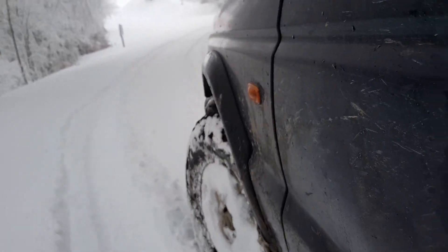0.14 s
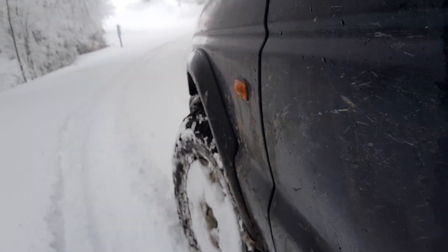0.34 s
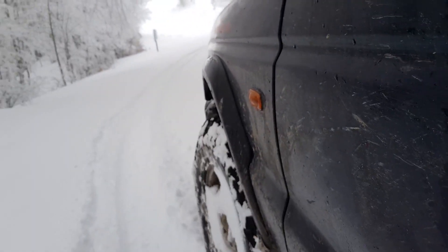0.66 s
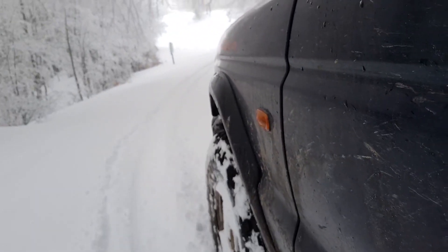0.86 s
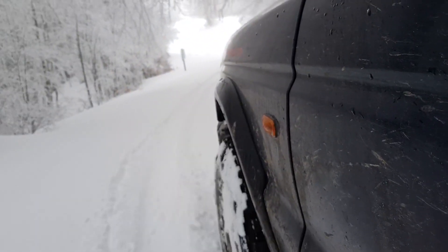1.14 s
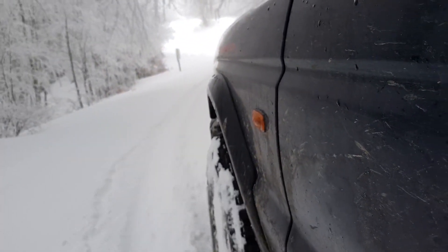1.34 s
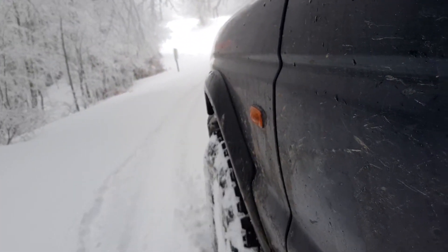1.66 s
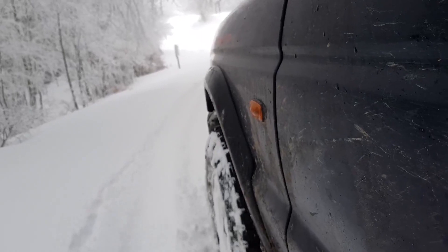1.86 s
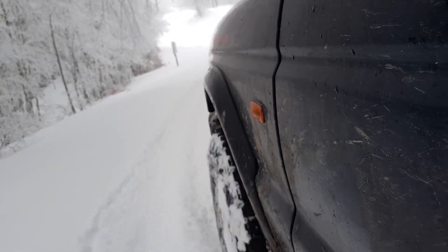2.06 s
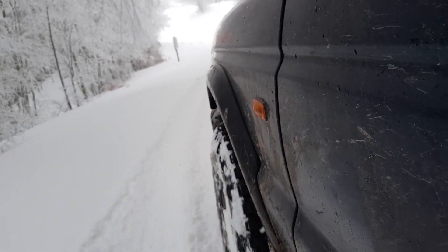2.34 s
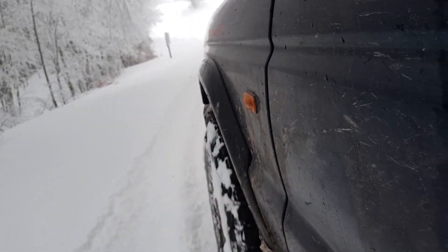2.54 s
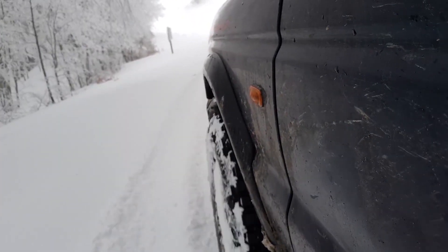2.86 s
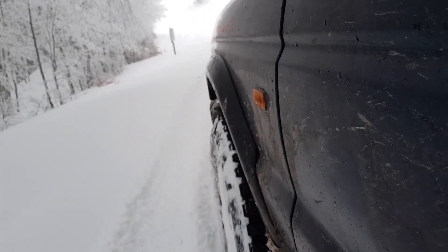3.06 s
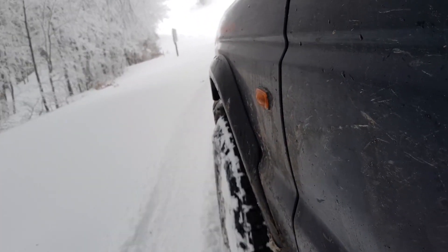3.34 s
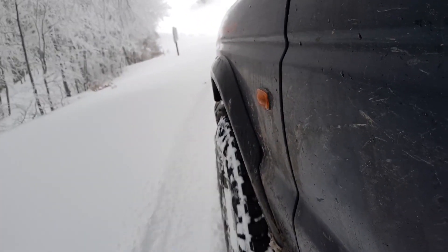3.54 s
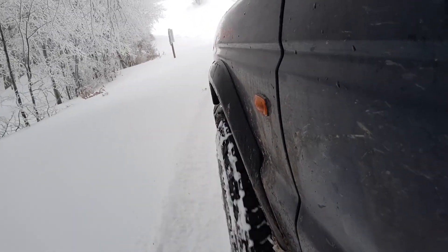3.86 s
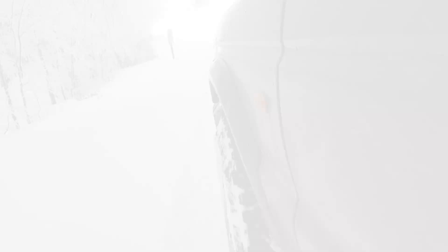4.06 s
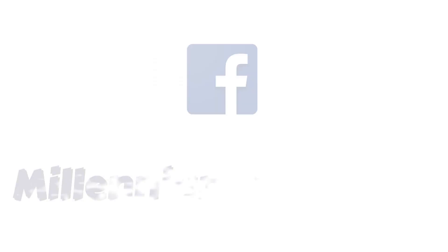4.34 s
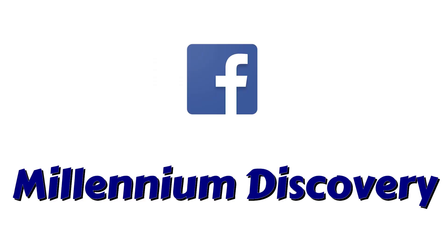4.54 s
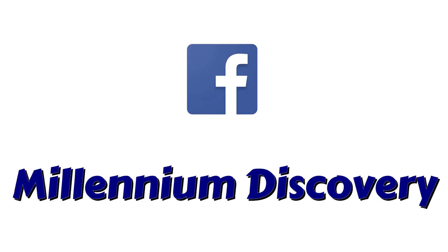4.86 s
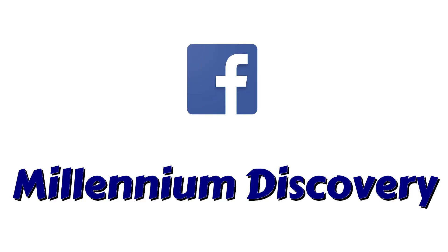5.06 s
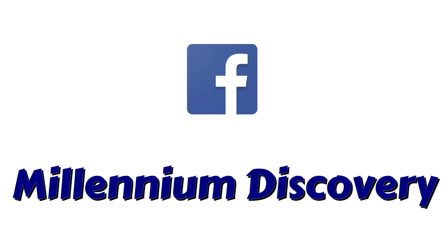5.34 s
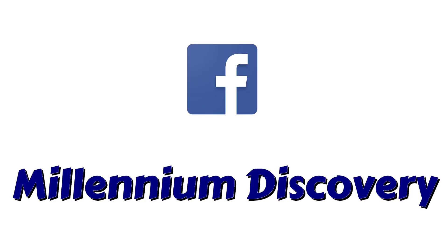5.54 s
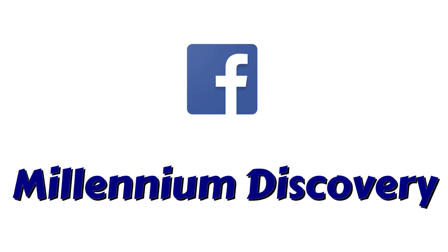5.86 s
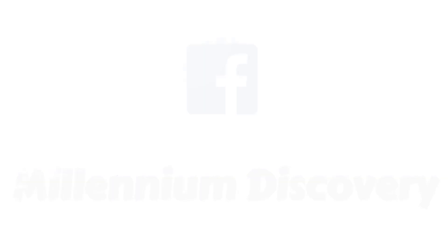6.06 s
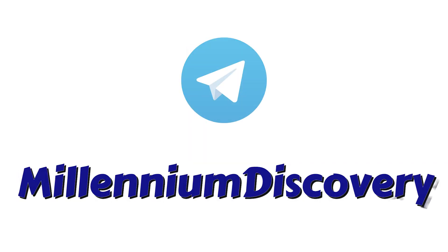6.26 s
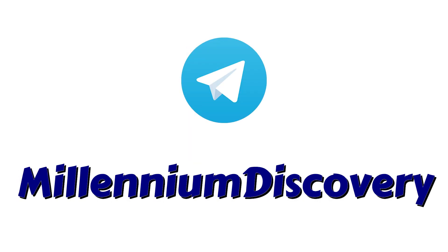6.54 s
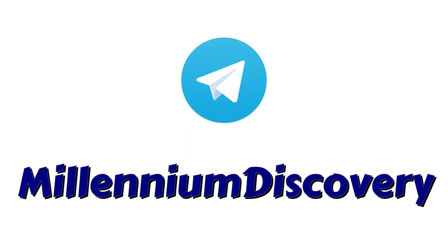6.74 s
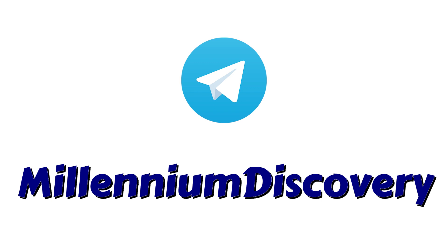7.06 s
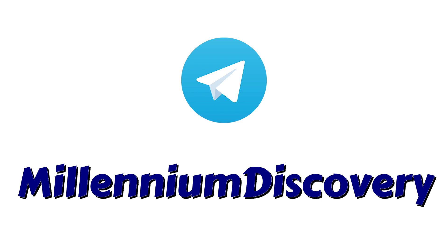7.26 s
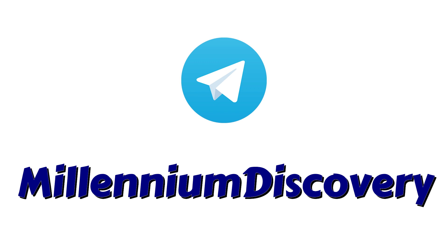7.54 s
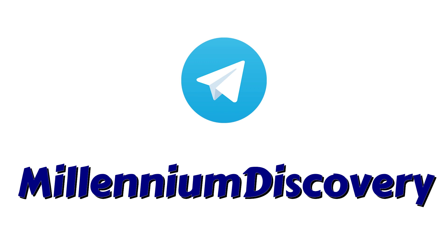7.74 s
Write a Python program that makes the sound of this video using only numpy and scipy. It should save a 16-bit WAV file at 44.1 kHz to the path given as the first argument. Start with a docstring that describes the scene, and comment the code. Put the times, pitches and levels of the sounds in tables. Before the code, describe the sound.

The sound fades in over the first 0.6 s: a five-cylinder diesel lugs at about 1,050 rpm, heard close beside the front wheel outdoors. Uneven knocks, a low thud and one sharper piston slap per cycle mix with snow scrubbing under the turned wheel until about 0.8 s. Between 0.5 and 1.75 s loose sheet metal buzzes in short ringing bursts, with a thin ping around 0.6 to 1 s. From 1.6 s the clatter hardens and evens out, revs climbing to about 2,490 by 4.5 s; boom, whines, intake hiss and a faint high turbo whistle rise. Snow crunch is strongest around 2 s, then gives way to tyre roar, tread hum and fine spray. Tiny ice ticks occur, notably near 3.9 and 4.7 s. Speed then holds, with slight rev dips around 5.5 and 7.5 s and a gust near 6.9 s. From 7.2 s everything fades steadily.

```python
"""First, as the sound fades in, an engine booms and knocks: a five-cylinder diesel off-roader on a snowy road,
heard from beside the front wheel. Its boom, drone and whines are tones locked to the crank; its clatter is
noise that partly repeats on each cycle. Piston slap and bursts of rattling metal give way to hard clatter
and a rising turbo whistle. Filtered noise makes the roar of tyres and wind, and intake air hisses.
Clicks make the snow, the tread hums as tones, ice ticks, and at the end all fades out."""
import sys
import numpy as np
from scipy import signal
from scipy.fft import rfft, irfft, next_fast_len
from scipy.io import wavfile
from scipy.ndimage import uniform_filter1d

SR = 44100
rng = np.random.default_rng(int(sys.argv[2]) if len(sys.argv) > 2 else 0)


def int16_out(signal):
    """Quantize to a 16-bit WAV file."""
    q = np.round(np.clip(np.atleast_2d(signal).T, -1, 1) * 32767)
    wavfile.write(sys.argv[1], SR, q.astype(np.int16))


N = 348381
TIME = np.arange(N) / SR  # s
LEFT_RIGHT = np.array([[1], [-1]])  # side sound has opposite signs left and right
# the engine runs lumpily below the first speed and evenly above the second
LUGGING_RPM, REVVING_RPM = 1390, 1870
CRUISE_HZ = 35  # tread repeats per second at cruising speed


def undb(db):
    """Turn decibels into a gain."""
    return 10 ** (np.asarray(db) / 20)


def unit(x):
    """Scale to an rms of 1."""
    return x / np.sqrt(np.mean(x ** 2))


def bump(x, centre, width):
    """A bell curve: 1 at the centre."""
    return np.exp(-((x - centre) / width) ** 2)


def ramp(x, start, length):
    """0 before the start, 1 once the length has passed."""
    return np.clip((x - start) / length, 0, 1)


def ring_down(age, t60):
    """Die away by 60 dB in t60 seconds."""
    return np.exp(-np.log(1000) * age / t60)


def curve(table):
    """Draw straight lines between the points of a timed table."""
    s, values = np.transpose(table)
    return np.interp(TIME, s, values)


def colour(x, spectrum):
    """Filter by a spectrum table, joining its points on a log pitch scale."""
    hz, db = np.transpose(spectrum)
    size = next_fast_len(N + 4096)
    bins = np.maximum(np.arange(size // 2 + 1) * SR / size, 1)
    gain = undb(np.interp(np.log(bins), np.log(hz), db))
    return irfft(rfft(x, size) * gain, size)[..., :N]


# width of the sound, side compared with mid: (f/Hz, level/dB)
STEREO_WIDTH = [(60, -28), (300, -20), (700, -14), (1400, -7.5), (2800, -3), (5500, -3.5), (9000, 0.5),
                (16000, 1)]


def radiate(pair, spectrum):
    """Colour two unrelated signals and spread them as mid and side: narrow bass, wide treble."""
    mid, side = colour(pair, spectrum)
    return unit(mid + colour(side, STEREO_WIDTH) * LEFT_RIGHT)


def walk(rate):
    """Wander at random: levels held for 1 / rate seconds, then smoothed twice; spread near 1."""
    k = int(SR / rate)
    held = np.repeat(rng.standard_normal(N // k + 1), k)
    return 1.27 * uniform_filter1d(uniform_filter1d(held, k), k)[:N]


def tone(turns, waver_db, smear, rate):
    """A sine of rms near 1 whose level (dB) and phase (radians) wander."""
    level = np.sqrt(2) * undb(waver_db * walk(rate))
    return level * np.sin(2 * np.pi * turns + smear * walk(rate))


def grains(rate, spread_db):
    """Random clicks, so many a second; a wider spread makes a few much larger than the rest."""
    sizes = undb(spread_db * np.minimum(rng.exponential(size=(2, N)), 5))
    clicks = rng.random((2, N)) < rate / SR
    return unit(clicks * sizes * rng.standard_normal((2, N)))


def whistle(turns, stir):
    """A breathy whistle: turbulence stirs its phase so many times a second."""
    mid, side = (tone(turns, waver_db=2.5, smear=2.2, rate=stir) for _ in range(2))
    return (mid + .5 * side * LEFT_RIGHT) * undb(1.2 * walk(14))


# engine tones that boom in body and pipes: multiples of the two-turn working cycle
BOOM_MULTIPLES = (5, 10, 11, 16)
# strength of each before the body acts: (level/dB at low revs, level/dB at high revs)
BOOM_STRENGTHS = [(-22, -23.5), (-27, -29), (-50, -26.5), (-28.5, -27)]
# resonances of body and pipes that the tones climb through: (f/Hz, level/dB)
BODY_RESONANCES = [(44, -8.5), (54, -5), (66, -0.5), (74, 2.5), (83, -6.5), (95, -12.5), (108, -12.5),
                   (130, -4), (160, -15), (192, -16.5), (212, -6), (232, -7.5), (257, -1.5), (278, -16),
                   (350, -14.5)]
# the firing tone briefly swells or sinks: (t/s, width/s, level/dB)
FIRING_SWELLS = [(4.6, 0.25, -16), (5.1, 0.23, 6.5), (5.6, 0.14, 2.5), (6.0, 0.2, -3), (6.5, 0.13, 6.5)]


def boom(cycles, rpm, revving):
    """Low engine tones swell and sink as they climb through the resonances of the body."""
    body_hz, body_db = np.transpose(BODY_RESONANCES)
    tones = []
    for k, (slow_db, fast_db) in zip(BOOM_MULTIPLES, BOOM_STRENGTHS):
        tone_hz = k * rpm / 120  # one cycle is two turns
        resonance_db = np.interp(np.log(tone_hz), np.log(body_hz), body_db)
        db = slow_db + (fast_db - slow_db) * revving + resonance_db
        tones.append(undb(db) * tone(k * cycles, waver_db=.4, smear=.04, rate=12))
    swell_db = sum(db * bump(TIME, s, width) for s, width, db in FIRING_SWELLS)
    return tones[0] * undb(swell_db) + sum(tones[1:])


# further engine tones, at full strength: (multiple of the working cycle, level/dB)
DRONE_TONES = [(3, -47), (6, -39), (8, -47), (9, -33.5), (13, -42), (17, -39), (28, -46)]


def drone(cycles, rpm):
    """More tones in step with the crank sound at a quarter strength, then rise fully at high revs."""
    tones = 0
    for k, db in DRONE_TONES:
        tones = tones + undb(db) * tone(k * cycles + rng.random(), waver_db=1.4, smear=.3, rate=5)
    return tones * (.25 + .75 * ramp(rpm, 2330, 280))


# one knock for each cylinder, in firing order: (level/dB, counted twice at low revs; level/dB, added to the
# first at high revs)
CYLINDER_KNOCKS = [(-3, -1), (-7, -2), (-5.5, -1), (-7, -4), (-6, -4)]
# clatter left between knocks: slow firings leave deeper gaps
BETWEEN_SLOW, BETWEEN_FAST = 0.13, 0.44
KNOCK_LENGTH = 0.34  # share of the time between firings


def knocks(cycles, revving, count=5):
    """Each cylinder fires with a sharp knock that dies away; they even out as the revs rise."""
    cylinder = (cycles * count).astype(int) % count
    since = cycles * count % 1
    slow_db, fast_db = np.transpose(CYLINDER_KNOCKS)
    knock_db = slow_db[cylinder] * (2.0 - revving) + fast_db[cylinder] * revving + .7 * walk(60)
    between = BETWEEN_SLOW + (BETWEEN_FAST - BETWEEN_SLOW) * revving
    blow = between + undb(knock_db) * np.exp(-(since / KNOCK_LENGTH) ** 2)
    # keep the average strength steady over a quarter of a second
    return blow / np.sqrt(uniform_filter1d(blow ** 2, SR // 4))


def rattle(cycles, repeat, size=16384, count=420):
    """Vibration that comes back alike on each working cycle, mixed with a share that is new each time."""
    partials = np.zeros((2, size // 2 + 1), complex)
    partials[:, 1:count + 1] = np.exp(2j * np.pi * rng.random((2, count)))
    partials[:, list(BOOM_MULTIPLES) + [k for k, _ in DRONE_TONES]] = 0  # these sound in boom and drone
    place = cycles % 1 * size
    alike = np.array([np.interp(place, np.arange(size), p) for p in irfft(partials)])
    # both shares have the same strength per Hz
    rate = np.gradient(cycles) * SR
    alike = unit(alike) * np.sqrt(2 * count * rate / SR)
    return np.sqrt(repeat) * alike + np.sqrt(1 - repeat) * rng.standard_normal((2, N))


# engine load, heard as the level of the clatter: (t/s, level/dB)
ENGINE_LOAD = [(0, -43), (.6, -41), (1.1, -45.5), (1.6, -37), (2.6, -35), (3.4, -35), (3.95, -34),
               (4.4, -35.5), (7.2, -34)]
# relative spectrum of the low thud: (f/Hz, level/dB)
THUD_SPECTRUM = [(30, -39), (70, -9), (130, 0), (180, 1), (260, 2), (360, 0.5), (430, -17), (560, -16.5),
                 (750, -18), (1200, -48.5)]
# relative spectrum of the hard ringing: (f/Hz, level/dB)
RING_SPECTRUM = [(250, -54), (500, 3.5), (750, -2), (1050, 0), (1200, 2.5), (1400, -5), (1530, -6),
                 (1690, -6.5), (1820, -6), (2300, -13.5), (3000, -20.5), (3800, -18), (5000, -25),
                 (14000, -59)]
# share of the ringing clatter that repeats: slow firings differ more
REPEAT_SLOW, REPEAT_FAST = 0.59, 0.88


def clatter(cycles, revving):
    """Each knock shakes the engine block, which thuds low and rings hard."""
    blow = knocks(cycles, revving)
    shake = rattle(cycles, repeat=.85) * np.sqrt(blow)
    hard = rattle(cycles, repeat=REPEAT_SLOW + (REPEAT_FAST - REPEAT_SLOW) * revving) * blow
    thud = radiate(shake, THUD_SPECTRUM) * undb(8.0 - 6.8 * revving)
    ring = radiate(hard, RING_SPECTRUM) * undb(.8 - .5 * revving)
    return undb(curve(ENGINE_LOAD)) * (thud + ring)


# pitches at which the block rings when one piston slaps: (f/Hz, relative level/dB, t60/s)
SLAP_RINGS = [(560, -7, .025), (720, -4, .035), (900, -5, .02), (1020, 0, .028), (1130, -4, .02),
              (1215, -1, .032), (1450, -7, .02), (1780, -9, .02)]
# relative spectrum of loose metal, also used for the crack: (f/Hz, level/dB)
METAL_SPECTRUM = [(300, -8), (900, -5), (1300, -5), (1480, -1), (1680, -7), (1820, -1), (2300, -7),
                  (2850, -6), (3200, -11), (3480, -5), (4100, -19), (6000, -25), (12000, -36), (16000, -46)]
SLAP_DB, SLAP_REVVING_DB, SLAP_RISE_S = -31, .5, .0015
SLAP_FADES_RPM, SLAP_FADE_RANGE_RPM = 1470, 520
# while the engine lugs, every slap cracks sharply and sets off a thin metallic ping
PING_HZ, PING_RPM, PING_RANGE_RPM, PING_DB, PING_T60_S = 3550, 1275, 70, -41, .06
CRACK_DB, CRACK_T60_S = -35, .055


def slap(cycles, rpm, revving):
    """One piston slaps the block once a cycle until the revs are high; crack and ping join while it lugs."""
    age = cycles % 1 * 120 / rpm  # seconds since the slap

    def mode(hz, t60):
        """One pitch of struck metal, quick to rise and slower to die away."""
        shape = (1 - np.exp(-age / SLAP_RISE_S)) * ring_down(age, t60)
        return shape * tone(hz * age, waver_db=.8, smear=1.6, rate=260)

    block = sum(undb(db) * mode(hz, t60) for hz, db, t60 in SLAP_RINGS)
    block = block * undb(SLAP_DB + SLAP_REVVING_DB * revving)
    block = block * (1 - ramp(rpm, SLAP_FADES_RPM, SLAP_FADE_RANGE_RPM))
    crack = radiate(grains(rate=5000, spread_db=1.5), METAL_SPECTRUM) * ring_down(age, CRACK_T60_S)
    ping = mode(PING_HZ, PING_T60_S) * undb(PING_DB)
    return block + (ping + crack * undb(CRACK_DB)) * bump(rpm, PING_RPM, PING_RANGE_RPM)


# relative spectrum of snow spray: (f/Hz, level/dB)
SPRAY_SPECTRUM = [(1200, -9), (2400, 1.5), (3100, -0.5), (3600, 3.5), (4050, 1.5), (4800, -6.5),
                  (5500, -3.5), (7000, -10.5), (8000, -8.5), (9000, -13.5), (11000, -13.5), (13500, -22),
                  (16000, -40)]
# relative spectrum of the fine powder, which hisses at any speed: (f/Hz, level/dB)
POWDER_SPECTRUM = [(5000, -20), (8000, -2), (11500, 4), (13500, -4), (16000, -12)]
# spray level at cruising speed, and its rise for each doubling of road speed
SPRAY_DB, SPRAY_DB_PER_OCTAVE = -46.5, 13
POWDER_DB = -67


def snow(tread_hz, lift_db):
    """Snow thrown off the tread patters finely in the wheel arch, over a thin hiss of powder."""
    octaves = np.log2(tread_hz / CRUISE_HZ)
    patter = grains(rate=20000, spread_db=1.2) * undb(.8 * walk(30))
    spray = radiate(patter, SPRAY_SPECTRUM) * undb(SPRAY_DB + SPRAY_DB_PER_OCTAVE * octaves)
    powder = radiate(grains(rate=6600, spread_db=0.0), POWDER_SPECTRUM) * undb(POWDER_DB)
    return (spray + powder) * undb(lift_db)


# relative spectrum of tyres and wind: (f/Hz, level/dB)
ROAR_SPECTRUM = [(20, -40), (35, -13.5), (60, -6), (110, -1.5), (200, -3), (370, -1), (450, -5.5),
                 (600, -4.5), (900, -13.5), (1400, -16), (1700, -24.5), (2100, -22), (3000, -31.5),
                 (7000, -53.5)]
# roar level at cruising speed, and its rise for each doubling of road speed
ROAR_DB, ROAR_DB_PER_OCTAVE = -27, 17.5


def roar(tread_hz, lift_db):
    """Tyres and wind make an uneven rushing noise that grows with road speed."""
    octaves = np.log2(tread_hz / CRUISE_HZ)
    uneven = undb(.5 * walk(3.48) + 0.49 * walk(45))
    rush = radiate(rng.standard_normal((2, N)) * uneven, ROAR_SPECTRUM)
    return rush * undb(ROAR_DB + ROAR_DB_PER_OCTAVE * octaves + lift_db)


# tones of the unevenly spaced tread blocks, before the rise with road speed:
# (multiple of the tread rate, level/dB while gathering speed, level/dB when cruising)
TREAD_TONES = [(9, -38.5, -40), (11, -44, -33.5), (13, -49, -43), (14, -50, -44), (15, -44, -40.5),
               (17, -45, -45), (28, -62, -54)]
HUM_DB_PER_OCTAVE = 21  # rise for each doubling of road speed
HUM_BUILDS_HZ, HUM_BUILD_RANGE_HZ = 32.6, 1.2  # tread rates at which the hum takes its cruising levels
# the axle whine lifts above its base level around one tread rate
AXLE_MULTIPLE = 26  # of the tread rate
AXLE_DB, AXLE_PEAK_HZ, AXLE_WIDTH_HZ, AXLE_LIFT_DB = -60, 31.6, 3.0, 17


def hum_and_axle(tread_hz):
    """Tread blocks hum and the axle whines, all as tones in step with the road speed."""
    turns = np.cumsum(tread_hz) / SR
    cruising = ramp(tread_hz, HUM_BUILDS_HZ, HUM_BUILD_RANGE_HZ)
    hum = 0
    for k, slow_db, fast_db in TREAD_TONES:
        level = undb(slow_db + (fast_db - slow_db) * cruising)
        hum = hum + level * tone(k * turns, waver_db=1.6, smear=.3, rate=12)
    hum = hum * undb(HUM_DB_PER_OCTAVE * np.log2(tread_hz / CRUISE_HZ))
    axle = tone(AXLE_MULTIPLE * turns, waver_db=2, smear=.5, rate=14)
    axle_db = AXLE_DB + AXLE_LIFT_DB * bump(tread_hz, AXLE_PEAK_HZ, AXLE_WIDTH_HZ)
    return hum + axle * undb(axle_db)


# bursts from loose sheet metal as the throttle opens: (t/s, level/dB)
METAL_BURSTS = [(0.490, -38.5), (.511, -45), (.589, -39.5), (.607, -46), (0.682, -39.5), (0.770, -40.5),
                (0.954, -50), (1.317, -48), (1.398, -40.5), (1.549, -42), (1.742, -38)]
RATTLE_HZ, RATTLE_RING_DB, RATTLE_SWELL_S = 1474, -7, 0.006
RATTLE_GRAIN_HZ, RATTLE_CHATTER_DB = 260, 3  # how fast and how strongly the bursts flutter


def loose_metal():
    """A loose piece of sheet metal buzzes in short, ringing bursts."""
    bursts = np.zeros(N)
    for s, db in METAL_BURSTS:
        age = np.maximum(TIME - s, 0) / RATTLE_SWELL_S
        bursts += undb(db) * age * np.exp(1 - age)
    bursts = bursts * undb(RATTLE_CHATTER_DB * walk(RATTLE_GRAIN_HZ))
    ring = undb(RATTLE_RING_DB) * tone(RATTLE_HZ * TIME, waver_db=1.5, smear=.8, rate=150)
    buzz = radiate(grains(rate=9000, spread_db=1), METAL_SPECTRUM)
    return bursts * (buzz + ring)


# relative spectrum of crunching snow: (f/Hz, level/dB)
CRUNCH_SPECTRUM = [(300, -22), (700, 2.5), (1400, 1), (2200, -12.5), (3400, -6.5), (5000, -27),
                   (12000, -50)]
CRUNCH_DB = -46.5
CRUNCH_PEAK_HZ, CRUNCH_RANGE_HZ = 28.9, 4.2  # tread rate where loudest, and range


def crunch(tread_hz):
    """Below cruising speed the snow packs under the tread in irregular clusters of tiny cracks."""
    cracks = grains(rate=900, spread_db=1.5) * undb(2.5 * walk(40))
    level = undb(CRUNCH_DB) * bump(tread_hz, CRUNCH_PEAK_HZ, CRUNCH_RANGE_HZ)
    return radiate(cracks, CRUNCH_SPECTRUM) * level


# bits of ice tick against the wing; ICE_DB is added to each level: (t/s, level/dB, f/Hz)
ICE_HITS = [(1.0631, -51, 10300), (1.343, -52, 11400), (1.8174, -55, 10100), (2.408, -51, 10500),
            (3.9, -49, 7000), (3.95, -51, 7000), (4.7213, -44, 10000)]
ICE_DB, ICE_T60_S = -2.5, 0.04


def ice():
    """Small bits of ice hit the metal with a dry tick: a short burst of noise around one pitch."""
    out = np.zeros(N)
    for s, db, hz in ICE_HITS:
        age = np.maximum(TIME - s, 0)
        noise = rng.standard_normal(N)
        crack = unit(signal.lfilter(*signal.iirpeak(hz, 2, fs=SR), noise))
        out += undb(db + ICE_DB) * crack * (age > 0) * ring_down(age, ICE_T60_S)
    return out


# pitch and level of the whistle at TURBO_RPM, and how both climb with the revs
TURBO_RPM, TURBO_HZ, TURBO_HZ_PER_RPM = 1750, 10700, 8.6
TURBO_DB, TURBO_DB_PER_RPM, TURBO_OCTAVE_BELOW_DB = -75.3, 0.001, -72


def turbo(rpm):
    """The turbo whistle climbs in step with the revs; at high revs the octave below joins it."""
    above = rpm - TURBO_RPM
    turns = np.cumsum(TURBO_HZ + TURBO_HZ_PER_RPM * above) / SR
    high = whistle(turns, stir=480) * ramp(rpm, 1500, 250) * undb(TURBO_DB + TURBO_DB_PER_RPM * above)
    low = whistle(turns / 2, stir=300) * ramp(rpm, 2200, 100) * undb(TURBO_OCTAVE_BELOW_DB)
    return high + low


# gear and belt whines, each swelling as it climbs through a resonance:
# (multiple of the working cycle, level/dB, loudest at/rpm, range/rpm)
DRIVE_WHINES = [(35, -46, 2040, 140), (42, -41, 2630, 70), (43, -44.5, 2630, 80), (47, -44, 2410, 65),
                (47, -43.5, 2630, 70), (48, -48, 2330, 150), (52, -46, 2380, 140), (54, -44, 2620, 130),
                (56, -46.5, 2470, 130), (58, -46, 2630, 90), (59, -42, 2560, 270), (61, -46.5, 2610, 100),
                (61, -45, 2290, 90), (64, -41, 2310, 130), (64, -50, 2560, 120), (66, -46, 2540, 130),
                (66, -47, 2260, 120), (69, -46.5, 2080, 130), (74, -47, 1970, 80), (75, -57, 2480, 90),
                (79, -50, 1830, 110), (81, -49, 1760, 100), (83, -52, 2630, 60), (84, -50, 1760, 100)]


def whines(cycles, rpm):
    """Gears and belts whine in step with the crank, each loudest around its own engine speed."""
    out = 0
    for k, db, best, span in DRIVE_WHINES:
        line = tone(k * cycles + rng.random(), waver_db=1.5, smear=.3, rate=7)
        out = out + undb(db) * bump(rpm, best, span) * line
    return out


# intake cavities, each hissing over its own range of revs: (f/Hz, loudest at/rpm, range/rpm, level/dB)
INTAKE_CAVITIES = [(3990, 1880, 130, -54), (4045, 2290, 230, -52), (5300, 2330, 120, -62),
                   (3040, 2460, 80, -60), (3730, 2470, 77, -56), (4030, 2635, 25, -55)]
INTAKE_DRIFT = .004  # share of the pitch


def intake(rpm):
    """Rushing air sets one cavity after another hissing as the revs rise; their pitches drift a little."""
    drifting = np.cumsum(1 + INTAKE_DRIFT * walk(4)) / SR
    out = 0
    for hz, best, span, db in INTAKE_CAVITIES:
        out = out + undb(db) * bump(rpm, best, span) * whistle(hz * drifting, stir=260)
    return out


def engine(rpm):
    """Add up boom, drone, whines, slap and clatter, all locked to the crankshaft."""
    # working cycles so far, with a slight wander in timing
    cycles = .018 + np.cumsum(rpm / 120) / SR + .003 * walk(3)
    revving = ramp(rpm, LUGGING_RPM, REVVING_RPM - LUGGING_RPM)
    tones = boom(cycles, rpm, revving) + drone(cycles, rpm) + whines(cycles, rpm)
    return tones + slap(cycles, rpm, revving) + clatter(cycles, revving)


# narrow resonances of the wing and wheel arch: (f/Hz, width/Hz, lift level/dB)
PANEL_RESONANCES = [(838, 32, 3), (959, 23, 3.5), (1263, 107, 2.5), (1501, 32, 6.5), (1827, 29, 5.5),
                    (2154, 36, 4), (2535, 110, 3.5), (3010, 60, 3), (4460, 110, 2.5), (8000, 410, 2.5)]


def panels(x):
    """Sheet metal and arch ring at a few narrow pitches and colour all that passes them."""
    out = x
    for hz, width_hz, db in PANEL_RESONANCES:
        peak = signal.lfilter(*signal.iirpeak(hz, hz / width_hz, fs=SR), x)
        out = out + (undb(db) - 1) * peak
    return out


# crankshaft speed: (t/s, speed/rpm)
CRANK_SPEED = [(0.0, 1053), (0.32, 1119), (0.65, 1305), (1.23, 1380), (1.73, 1717), (2.43, 1889),
               (2.8, 1998), (3.0, 2045), (3.2, 2109), (3.5, 2230), (3.8, 2288), (4.2, 2411), (4.55, 2489),
               (4.8, 2481), (5.15, 2497), (5.5, 2438), (5.8, 2490), (6.0, 2504), (6.4, 2576), (7.0, 2635),
               (7.25, 2622), (7.52, 2522), (7.9, 2640)]
# road speed, as the rate at which the tread pattern repeats: (t/s, f/Hz)
TREAD_RATE = [(0, 20), (1.7, 27.95), (2.1, 29.4), (2.5, 30.35), (2.9, 31.07), (3.3, 31.9), (3.7, 32.96),
              (4.1, 33.85), (4.5, 34.65), (5.1, 34.97), (5.7, 34.82), (6.1, 34.96), (6.95, 35.72),
              (7.9, 35.3)]
# the steered wheel scrubs through deep snow until it straightens
STRAIGHTENS_S, STRAIGHTEN_TAKES_S, SCRUB_SPRAY_DB = 0.72, 0.18, 4
# one broad gust of wind lifts the roar and the snow
GUST_S, GUST_WIDTH_S, GUST_DB = 6.9, 0.31, 1.5


def scene():
    """Revs drive engine and air, road speed drives tyres and snow; all pass the wing, louder on the left."""
    rpm = curve(CRANK_SPEED)
    tread_hz = curve(TREAD_RATE)
    scrub = 1 - ramp(TIME, STRAIGHTENS_S, STRAIGHTEN_TAKES_S)
    gust_db = GUST_DB * bump(TIME, GUST_S, GUST_WIDTH_S)
    motor = engine(rpm) + loose_metal() + intake(rpm) + turbo(rpm)
    thrown_snow = snow(tread_hz, gust_db + SCRUB_SPRAY_DB * scrub)
    road = roar(tread_hz, gust_db) + hum_and_axle(tread_hz) + thrown_snow + crunch(tread_hz)
    lean_db = 0.36
    return panels(motor + road + ice()) * undb(lean_db * LEFT_RIGHT)


# the fader opens and closes evenly in dB, with a very short ramp up from silence
FADE_IN_ENDS_S, FADE_IN_DB_PER_S = .58, 35
FADE_OUT_STARTS_S, FADE_OUT_DB_PER_S = 7.23, 47
FADE_EDGE_S, TOP_HZ = .01, 15650


def record(dry):
    """Fade in and out, and cut the top with a steep low-pass filter."""
    fade_in_db = FADE_IN_DB_PER_S * np.minimum(TIME - FADE_IN_ENDS_S, 0)
    fade_out_db = -FADE_OUT_DB_PER_S * np.maximum(TIME - FADE_OUT_STARTS_S, 0)
    faded = dry * undb(fade_in_db + fade_out_db) * ramp(TIME, 0, FADE_EDGE_S)
    low_pass = signal.ellip(10, .2, 80, TOP_HZ, fs=SR, output="sos")
    return signal.sosfilt(low_pass, faded)


dry = scene()
out = record(dry)
int16_out(out)
```